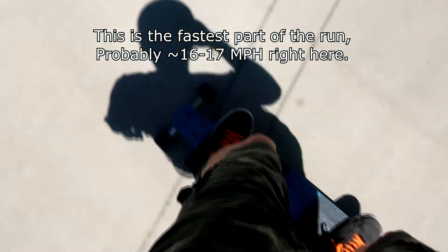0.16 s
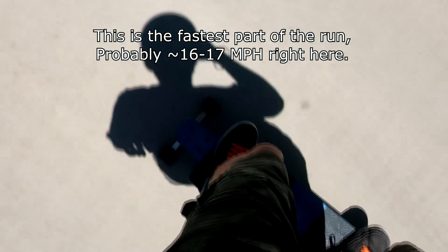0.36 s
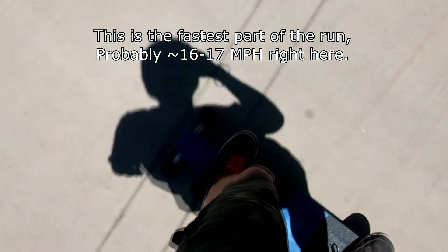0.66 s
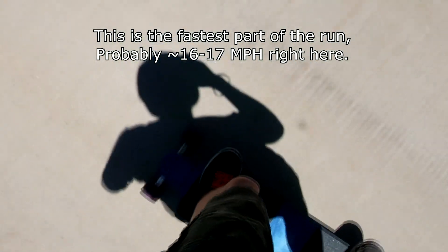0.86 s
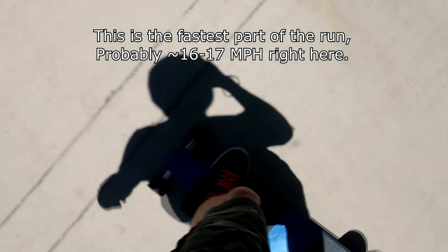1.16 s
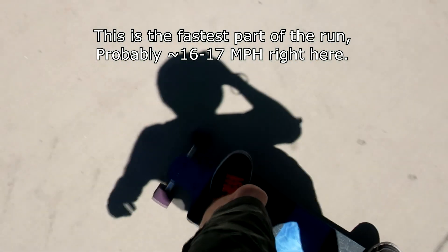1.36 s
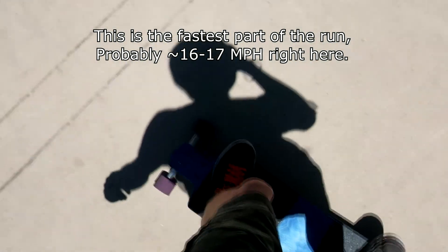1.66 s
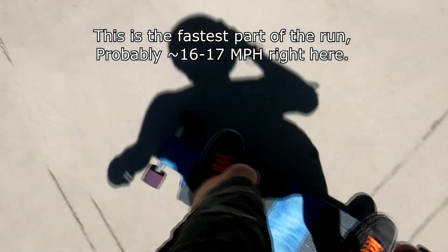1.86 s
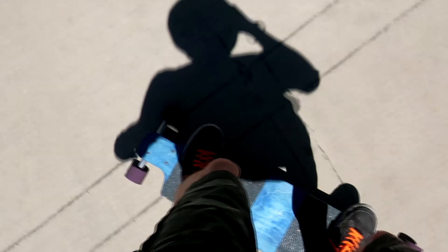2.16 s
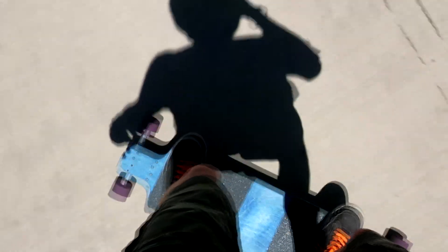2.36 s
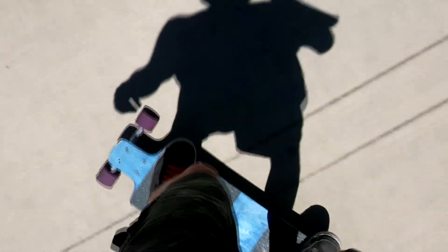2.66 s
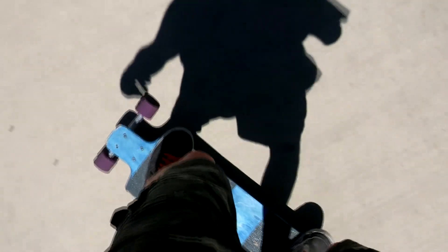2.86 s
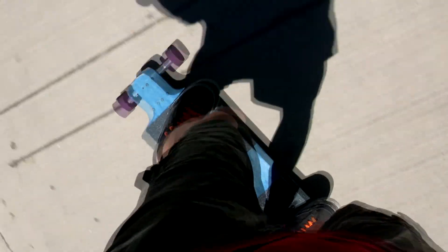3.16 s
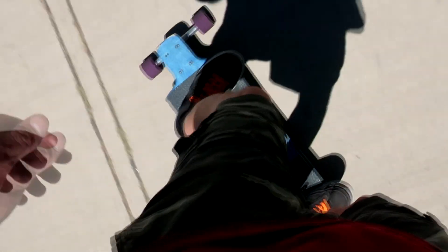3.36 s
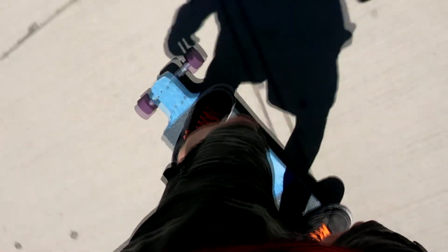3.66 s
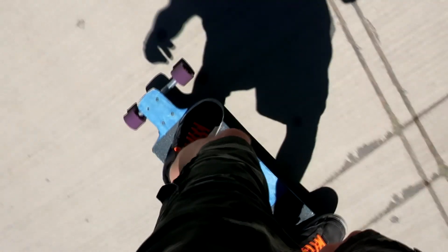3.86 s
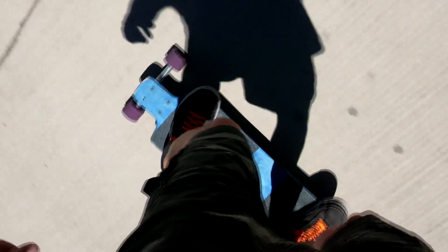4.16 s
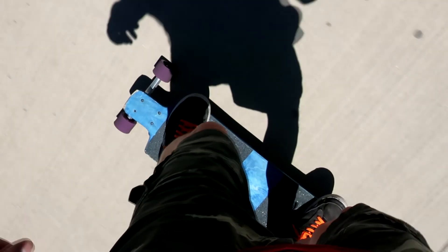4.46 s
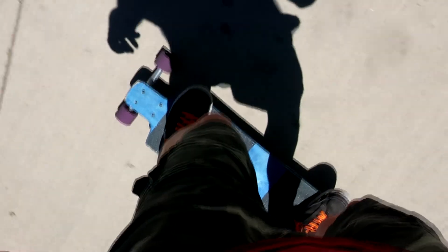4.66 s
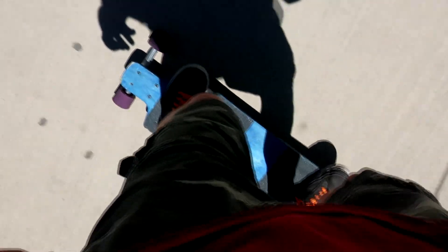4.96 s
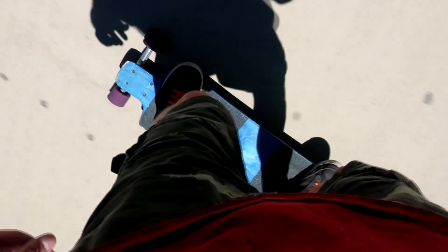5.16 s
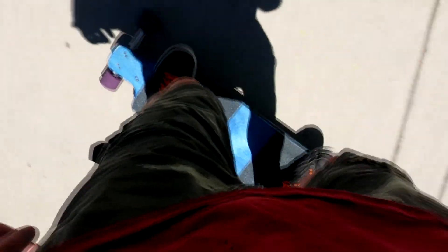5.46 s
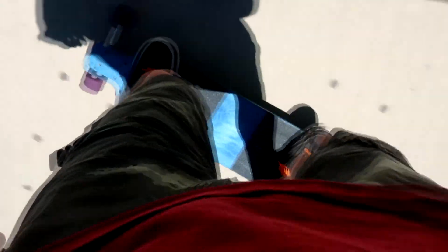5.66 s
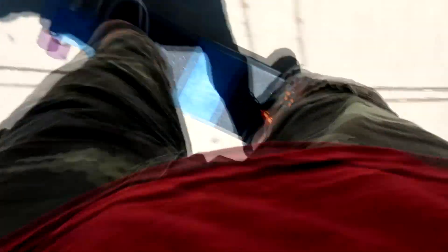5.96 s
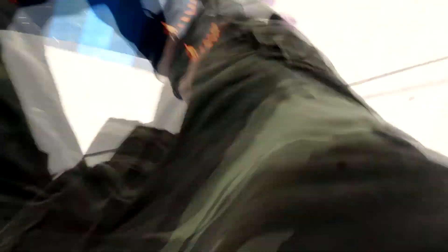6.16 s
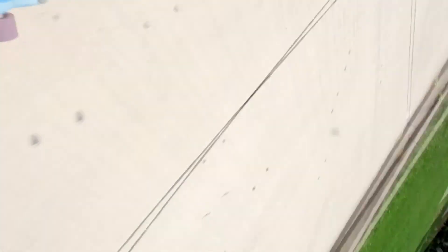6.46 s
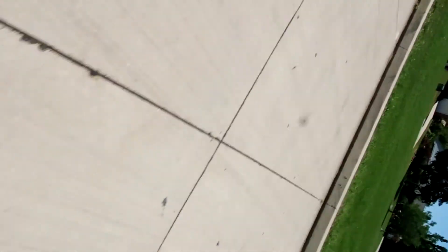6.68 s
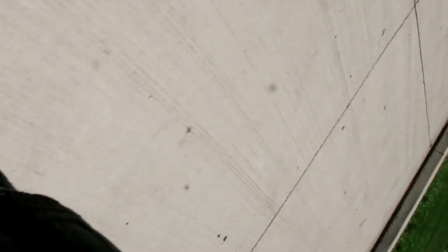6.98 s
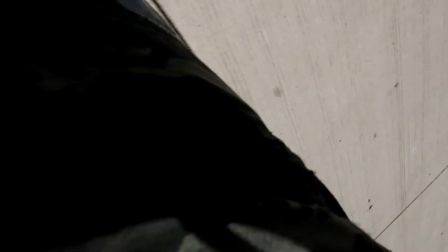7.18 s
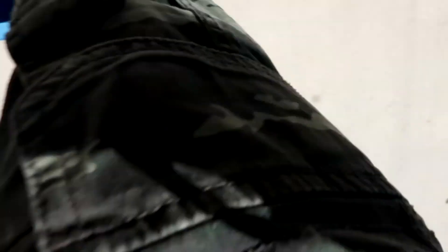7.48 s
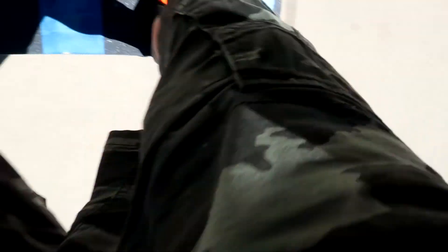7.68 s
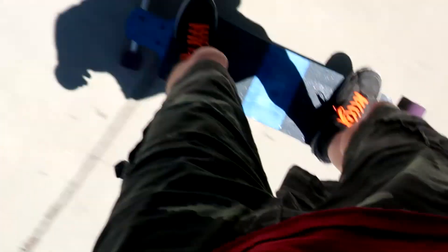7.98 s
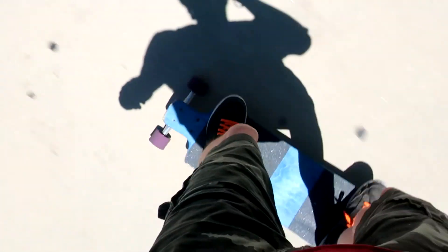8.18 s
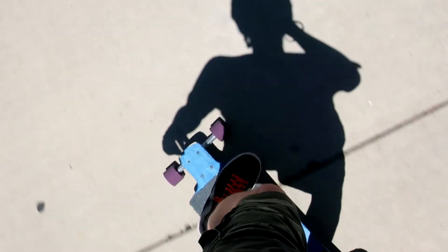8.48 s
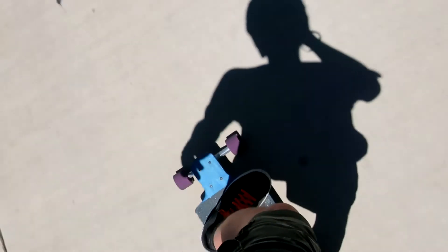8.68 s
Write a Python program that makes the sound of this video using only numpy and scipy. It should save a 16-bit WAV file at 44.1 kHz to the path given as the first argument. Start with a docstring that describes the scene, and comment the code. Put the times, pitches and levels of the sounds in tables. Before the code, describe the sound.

Close, handheld stereo sound from above a longboard speeding over outdoor concrete. A dense low-mid rumble runs throughout, with gritty metallic truck rattle and thin wheel hiss. Seams and stones give irregular clicks and dull knocks. Headwind buffets the microphone constantly; after six seconds it tears into bright slapping gusts, strongest just past seven, then eases back to rolling.

```python
"""A longboard rolls fast over jointed concrete, heard by a hand-held microphone pair above the deck.
Noise shaped as deck rumble, truck grit, ringing metal and wheel hiss jolts at joints and stones;
damped modes give low knocks, of axles in joints or wind on the ports. Headwind is fluttering noise
on the ports, with damped thumps and a bright, slapping rush when the pair turns into it.
Table levels are relative: gains and flutter in the functions shift them."""
import sys
import numpy as np
from scipy import signal
from scipy.fft import rfft, irfft, next_fast_len
from scipy.io import wavfile
from scipy.ndimage import uniform_filter1d

SR = 44100
rng = np.random.default_rng(int(sys.argv[2]) if len(sys.argv) > 2 else 0)


def bounce(signal):
    """Save signal as a 16-bit WAV file at the path given by the first command-line argument."""
    frames = np.transpose(np.atleast_2d(signal))
    limited = np.clip(frames, -1, 1)
    pcm = np.round(limited * 32767).astype(np.int16)
    wavfile.write(sys.argv[1], SR, pcm)


N = 389388


def from_db(db):
    """Amplitude gain of a level in dB."""
    return 10 ** (np.asarray(db) / 20)


def rms_one(x):
    """Scale to unit power."""
    return x / np.sqrt(np.mean(x ** 2) + 1e-20)


def unit(x):
    """Scale mid and side together to unit power in mid."""
    return x / x[0].std()


def in_time(rows):
    """Interpolate each column after t/s to one value a sample."""
    s, *columns = np.transpose(rows)
    t = np.arange(N) / SR
    return [np.interp(t, s, column) for column in columns]


def colour(x, points):
    """Causal minimum-phase filter through (f/Hz, gain/dB) points, by folding the cepstrum."""
    size = next_fast_len(N + SR // 4)
    hz = np.maximum(np.fft.rfftfreq(size, 1 / SR), 1)
    points_hz, points_db = np.transpose(points)
    db = np.interp(np.log(hz), np.log(points_hz), points_db)
    cepstrum = irfft(np.log(from_db(db)), size)
    cepstrum[1:size // 2] *= 2
    cepstrum[size // 2 + 1:] = 0
    response = np.exp(rfft(cepstrum))
    return irfft(rfft(x, size) * response, size)[..., :N]


def drift(rate_per_s):
    """Low-passed noise of unit power, changing about rate_per_s times a second."""
    r = np.exp(-2 * np.pi * rate_per_s / SR)
    noise = rng.standard_normal(N + SR)
    return rms_one(signal.lfilter([1], [1, -2 * r, r * r], noise)[SR:])   # first second settles


FLUTTER_SPAN_S = .2   # evens out over this time


def flutter(rate_per_s):
    """Quick wavering about a steady mean, bounded to +-2."""
    x = drift(rate_per_s)
    quick = x - uniform_filter1d(x, round(FLUTTER_SPAN_S * SR))
    return 2 * np.tanh(rms_one(quick) / 2)


def lumpy(db, rate_per_s):
    """Independent mid and side noise under one wavering level."""
    return rng.standard_normal((2, N)) * from_db(db * drift(rate_per_s))


def resonance(hz, width_hz):
    """Two-pole band-pass with about unit peak gain."""
    r = np.exp(-np.pi * width_hz / SR)
    b = (1 - r * r) / 2 * np.array([1, 0, -1])
    return b, [1, -2 * r * np.cos(2 * np.pi * hz / SR), r * r]


def moving_ring(x, hz, width_hz):
    """Resonance whose centre and width step along their curves in short blocks."""
    out, state, step = np.zeros_like(x), np.zeros((2, 2)), 1024
    width_hz = np.broadcast_to(width_hz, N)
    for i in range(0, N, step):
        b, a = resonance(hz[i], width_hz[i])
        out[:, i:i + step], state = signal.lfilter(b, a, x[:, i:i + step], zi=state)
    return out


def bursts(times_s, peak_db, t60_s, scatter_db=0):
    """Envelope of bursts, each a swell and a decay: x^2 exp(-x), normalised to its peak."""
    out, t = np.zeros(N), np.arange(SR // 8) / SR
    peak_db = peak_db + scatter_db * rng.standard_normal(len(times_s))
    for s, db, decay_s in np.broadcast(times_s, peak_db, t60_s):
        tau_s = np.clip(decay_s, .008, .12) / np.log(1000)
        i = round(max(s - tau_s, 0) * SR)
        x = t / tau_s
        burst = from_db(db) * (np.e * x / 2) ** 2 * np.exp(-x)
        out[i:i + len(t)] += burst[:N - i]
    return out


def tick_level(per_s, size, t60_s):
    """Level factor: 1 plus random ticks that swell and die, as of stones under a wheel or eddies breaking."""
    size_db = 1.5 * np.minimum(rng.exponential(1, N), 3)
    ticks = (rng.random(N) < per_s / SR) * from_db(size_db)
    r = from_db(-60 / (t60_s * SR))
    return 1 + size * np.e * signal.lfilter([1 - r], [1, -2 * r, r * r], ticks)


# Clicks in a jolt's cluster: t offset/s, level/dB
SNAP_TOUCHES = [(-.002, -8), (0, -1.5), (.002, -2.5), (.0045, -11)]
SNAP_DB = 12   # added to the peak and touch levels
TOUCH_JITTER_S, TOUCH_SCATTER_DB = 0.00065, 1.5


def snaps(times_s, peak_db):
    """A short cluster of clicks of either sign around each jolt."""
    out = np.zeros(N)
    for after_s, db in SNAP_TOUCHES:
        jitter, scatter, push = rng.standard_normal((len(times_s), 3)).T
        at = np.round((times_s + .002 + after_s + TOUCH_JITTER_S * jitter) * SR).astype(int)
        click_db = peak_db + SNAP_DB + db + TOUCH_SCATTER_DB * scatter
        out[at] += from_db(click_db) * np.sign(push)
    return out


# Deck rumble between jolts: t/s, level/dB
DECK_ROLL = [(0, -25), (.55, -23.5), (.7, -25.5), (.9, -21.5), (1.45, -25.5), (1.58, -30), (1.8, -24),
             (2.3, -25.5), (2.9, -24.5), (3.8, -22.5), (3.92, -25.5), (4.26, -22), (4.48, -26), (4.88, -22),
             (4.98, -27.5), (5.2, -22.5), (5.3, -23), (5.6, -28), (6.1, -23), (6.47, -21.5), (6.57, -28.5),
             (6.7, -20), (6.86, -26.5), (7.15, -17), (7.5, -24.5), (7.78, -22), (8.16, -36.5),
             (8.35, -34.5), (8.45, -30), (8.83, -23.5)]
# Deck rumble spectrum: f/Hz, density/dB per Hz
DECK_SPECTRUM = [(240, -19), (400, -5), (549, -1), (714, -5), (879, -8.5), (973, -5), (1120, -19.5),
                 (1370, -23), (1550, -25), (1720, -22), (2000, -26.5), (2600, -48.5), (4400, -120)]
# Joints and stones shaking the board: t/s, ring peak/dB, hardware re ring/dB, hiss re ring/dB
JOLTS = [(.0204, -28.5, -5, -11), (.2344, -33, 1, -13), (.398, -33, 7, -22), (.42, -39, 9, -22),
         (.4693, -30, -16, -33), (0.507, -37, 9, -22), (.521, -36, 6, -22), (0.616, -38, 8, -19),
         (.7123, -30, 1, -26), (.7575, -23, 2.5, -18), (.7864, -25, -5, -19), (0.8677, -27, -4, -16),
         (.8748, -22, -12, -18), (.8819, -18.5, 6.5, -13), (.9155, -31, 8, -15), (1.0373, -32, 11, -25),
         (1.305, -14.5, 0, -18), (1.4681, -24.5, 0, -18), (1.4864, -34, 9, -24), (1.656, -29, 2, -28),
         (1.8044, -40, -6, -5), (1.8462, -23, -5, -19), (1.946, -44, 15, -26), (1.981, -30, 10, -33),
         (2.001, -36, 5, -20), (2.008, -19, -1, -23), (2.0165, -31, 13, -12), (2.0244, -27.5, 7.5, -2),
         (2.0338, -25.5, 8, -3), (2.046, -29, 5, -1), (2.0554, -32, 13, -6), (2.0644, -36, 15, -14),
         (2.0873, -39, 10, -20), (2.1105, -50, 6, -20), (2.166, -38, -6, 2), (2.2117, -21.5, 3, -25),
         (2.24, -27, 1, -23), (2.289, -30, 0, -10), (2.399, -28, -10, -23), (2.576, -40, -5, 8),
         (2.6444, -27, -15, -23), (2.7228, -27, 3, -25), (3.2655, -24, -15, -14), (3.275, -14, -4, -22),
         (3.286, -36, 6, -12), (3.4273, -31.5, 10, -9), (3.4374, -32, 7, -2), (3.7933, -17.5, -12, -30),
         (3.848, -18, 4.5, -13), (3.855, -21, -1, -22), (3.9654, -17, -12, -21), (4.0123, -24, -16, -17),
         (4.0703, -21, -16, -28), (4.1683, -32, -18, -25), (4.1927, -19, -18, -25), (4.205, -22, -16, -25),
         (4.219, -25, -14, -25), (4.238, -20, -17, -23), (4.265, -20, -14, -25), (4.2724, -21, -12, -25),
         (4.283, -21, -14, -25), (4.296, -26, -10, -21), (4.319, -27, -16, -25), (4.363, -13.5, -18, -30),
         (4.374, -32, 2, -17), (4.398, -45, -16, -28), (4.4273, -35, -6, -14), (4.453, -27.5, -4, -25),
         (4.608, -28, -20, -31), (4.772, -28.5, -1, -21), (4.861, -19.5, 0.5, -16), (4.874, -21, -12, -24),
         (4.884, -35, -12, -24), (4.907, -26, -21, -25), (4.937, -32, 10.5, -16), (4.921, -27, -8, -24),
         (5.015, -32, -1, -20), (5.033, -33, 5, -21), (5.058, -38, -3, -22), (5.086, -41, 3, -22),
         (5.3737, -21, -4, -16), (5.3894, -23, -3.5, -16), (5.543, -18.5, -15, -20), (5.7815, -34, 2, 0),
         (5.9095, -27, -23, -30), (6.103, -16.5, -17, -22), (6.2894, -35, -8, 1), (6.769, -33, 1.5, -31),
         (7.1127, -22, -8, -26), (7.568, -19, -18, -26), (7.744, -15.5, -11, -26), (8.049, -25, -7, -17),
         (8.0666, -26.5, 8.5, -7), (8.077, -32, 3, -20), (8.089, -45, -2, -20), (8.2283, -27.5, 1, -24),
         (8.276, -34, 3, -17), (8.4674, -26, -2, -32), (8.5334, -26, -3, -30), (8.7226, -32, -2, -10)]
# Jolt decay by layer (grit, ring, hardware, hiss, deck): t60/s
JOLT_T60_S = [0.035, 0.025, 0.017, 0.023, 0.026]
# Jolt noise by layer (same order) re its peak: level/dB
JOLT_CHATTER_DB = [-13.5, -17, -16, -.6, -6]
LIFT_DB, LIFT_T60_S = 2, 0.047   # rumble dips briefly at each knock


def deck(paving_db):
    """Deck rumble: coloured noise under the rolling wheels, shuddering at jolts, dipping at knocks."""
    s, db, _, _ = np.transpose(JOLTS)
    knock_s = np.transpose(KNOCKS)[0]
    lift = np.minimum(bursts(knock_s, 0, LIFT_T60_S), 1)
    roll_db, = in_time(DECK_ROLL)
    level = from_db(roll_db + paving_db - LIFT_DB * lift)
    level += bursts(s, db + JOLT_CHATTER_DB[4], JOLT_T60_S[4])
    return level * unit(colour(lumpy(db=2.0, rate_per_s=13.7), DECK_SPECTRUM))


# Trucks between jolts: t/s, grit/dB, ring f/Hz, ring/dB, axle hardware/dB
TRUCKS = [(0, -44, 2060, -46.5, -42.5), (.6, -40, 2080, -45, -43), (.9, -43, 2100, -46, -39),
          (1.15, -37, 2000, -41.5, -46.5), (1.6, -38.5, 1930, -43, -45), (1.97, -31.5, 1940, -39.5, -40),
          (2.04, -43, 1970, -40, -41), (2.15, -31, 1950, -39.5, -38), (2.5, -34.5, 2010, -41.5, -45),
          (3.1, -33.5, 2180, -39, -41), (3.45, -40.5, 2100, -42.5, -42), (3.8, -34, 2200, -40, -42),
          (4.25, -44, 2300, -37.5, -47), (4.55, -37, 2210, -40, -45.5), (5.5, -39, 2290, -42.5, -46),
          (5.95, -37, 2350, -40, -41.5), (6.55, -49, 2250, -45, -54), (7.15, -35.5, 2310, -39, -48),
          (7.9, -39, 2120, -53.5, -49.5), (8.25, -42.5, 2060, -46, -49.5), (8.83, -39, 2200, -44, -40.5)]
# Truck grit spectrum: f/Hz, density/dB per Hz
GRIT_SPECTRUM = [(700, -16), (1200, 5.5), (1700, 2.5), (2300, -11), (2600, -7.5), (4400, -16),
                 (6100, -20.5), (8000, -25.5), (9000, -80.5), (15000, -56.5)]
# Truck ring bandwidth, per filter pass: t/s, width/Hz
RING_WIDTH = [(0, 480), (3.2, 480), (3.9, 670), (5.2, 650), (6, 550), (8.83, 544)]
# Axle hardware modes: f/Hz, width per pass/Hz, level/dB
HARDWARE_MODES = [(3440, 680, -2), (2910, 750, -11.5), (4000, 730, -12.5), (5170, 910, -10)]
NOTCH_RATIO, NOTCH_DEPTH, NOTCH_WIDTH_HZ = 0.86, 0.69, 1480   # grit dip, centre re ring


def truck_grit(grit_db, ring_hz, paving_db):
    """Grit shaking the trucks: a broad noise slope with a dip that follows the ring."""
    s, db, _, _ = np.transpose(JOLTS)
    grit = unit(colour(lumpy(db=1.3, rate_per_s=14.0), GRIT_SPECTRUM))
    grit = grit - NOTCH_DEPTH * moving_ring(grit, NOTCH_RATIO * ring_hz, NOTCH_WIDTH_HZ)
    steady = from_db(grit_db + paving_db + 1) * tick_level(per_s=44, size=.6, t60_s=0.0073)
    return grit * (steady + bursts(s, db + JOLT_CHATTER_DB[0], JOLT_T60_S[0]))


def truck_ring(ring_hz, ring_db, paving_db):
    """Truck ring: noise and jolt clicks through a wandering resonance, passed twice."""
    s, db, _, _ = np.transpose(JOLTS)
    steady = from_db(ring_db + paving_db + 0.94 * flutter(11))
    steady = steady * tick_level(per_s=40, size=.9, t60_s=0.0055)
    jolts = bursts(s, db + JOLT_CHATTER_DB[1], JOLT_T60_S[1])
    drive = lumpy(db=1.5, rate_per_s=49) * (steady + jolts)
    drive += snaps(s, db - 3.5)
    ring_hz = ring_hz * (1 + 0.024 * drift(25))
    width_hz, = in_time(RING_WIDTH)
    gain = np.sqrt(2 * SR / np.pi / width_hz)   # about unit power out of white noise
    once = moving_ring(drive, ring_hz, width_hz)
    return gain * moving_ring(once, ring_hz, width_hz)


def truck_hardware(hardware_db, paving_db):
    """Axle hardware: fixed modes, each shaken by its own noise and jolt clicks."""
    s, db, to_hardware_db, _ = np.transpose(JOLTS)
    peak_db = db + to_hardware_db
    out = np.zeros((2, N))
    for hz, width_hz, mode_db in HARDWARE_MODES:
        shake = from_db(hardware_db + paving_db - 3.5) * tick_level(per_s=33, size=.6, t60_s=0.015)
        shake += bursts(s, peak_db + JOLT_CHATTER_DB[2], JOLT_T60_S[2], scatter_db=6.0)
        drive = lumpy(db=2.5, rate_per_s=21) * shake + snaps(s, peak_db - 2.5)
        b, a = resonance(hz, width_hz)
        gain = from_db(mode_db) * np.sqrt(2 * SR / np.pi / width_hz)
        out += gain * signal.lfilter(b, a, signal.lfilter(b, a, drive))
    return out


def trucks(paving_db):
    """Trucks shaken by grit and jolts: grit noise, ring and hardware modes summed."""
    grit_db, ring_hz, ring_db, hardware_db = in_time(TRUCKS)
    out = truck_grit(grit_db, ring_hz, paving_db)
    out += truck_ring(ring_hz, ring_db, paving_db)
    return out + truck_hardware(hardware_db, paving_db)


ECHO_RATIO, ECHO_DEPTH, ECHO_WIDTH_HZ = 0.845, 0.44, 160   # dip centre re truck ring


def ground_echo(x):
    """Direct sound and concrete echo cancel in a narrow band: a resonance subtracted below the ring."""
    ring_hz = in_time(TRUCKS)[1]
    return x - ECHO_DEPTH * moving_ring(x, ECHO_RATIO * ring_hz, ECHO_WIDTH_HZ)


# Wheel hiss and stereo image: t/s, hiss/dB, width/dB
HISS_AND_WIDTH = [(0, -57, 4), (.42, -52.5, 1), (1.95, -53.5, -1.5), (2.03, -37, -6), (2.25, -52, 0),
                  (2.5, -57, 1), (3.17, -45.5, -4.5), (3.5, -51, -3.5), (4.28, -51, 3), (4.7, -74, 6),
                  (5.58, -67, 1), (6.15, -41, 2.5), (6.32, -47, 1), (6.52, -53, -3), (6.9, -42, -6.5),
                  (7.87, -46, -2), (8.24, -53, 1), (8.7, -46, -28)]
# Wheel hiss spectrum: f/Hz, density/dB per Hz
HISS_SPECTRUM = [(1760, -26.5), (3000, 1), (3550, 5.5), (4050, -2.5), (4600, 1.5), (5200, 7.5),
                 (5900, -0.5), (6780, 3), (8300, 0.5), (10000, -69), (13000, -42.5), (22000, -120)]
# Faint treble noise, 7 to 15 kHz: t/s, mid/dB, side/dB
FAINT_TREBLE = [(0, -64, -62), (1.95, -55.5, -47), (2.05, -55, -43), (2.13, -50, -46), (2.3, -52.5, -46),
                (2.4, -64, -52), (3.2, -58, -47), (3.6, -61.5, -57), (5.5, -60, -57), (6.1, -55.5, -46),
                (6.5, -84, -50), (7.05, -72, -38), (7.3, -54.5, -52), (7.6, -52, -43), (7.75, -69, -36),
                (8, -54.5, -56), (8.83, -55, -52)]
# Faint treble spectrum: f/Hz, density/dB per Hz
FAINT_TREBLE_SPECTRUM = [(7000, -46.5), (9500, 2), (12000, -2), (13500, -11), (14400, -4.5), (15000, 0.5)]


def hiss():
    """Wheel skins peel off concrete: coloured treble noise, with a fainter, higher noise above."""
    s, db, _, to_hiss_db = np.transpose(JOLTS)
    crack = bursts(s, db + to_hiss_db + JOLT_CHATTER_DB[3], JOLT_T60_S[3])
    hiss_db = in_time(HISS_AND_WIDTH)[0]
    skin = unit(colour(lumpy(db=3.5, rate_per_s=21.0), HISS_SPECTRUM))
    skin = skin * (from_db(hiss_db + 3.5) + crack)
    faint_db = np.array(in_time(FAINT_TREBLE)) + 2.0 * np.array([drift(11), drift(6)])
    faint = unit(colour(rng.standard_normal((2, N)), FAINT_TREBLE_SPECTRUM))
    faint = faint * (from_db(faint_db) + crack * [[.15], [.3]])
    return skin * [[.3], [1]] + faint


# Headwind on the ports: t/s, buffeting/dB, drone/dB
WIND = [(0, -13.5, -18.5), (.15, -19, -22), (.22, -18, -19.5), (.5, -21.5, -21.5), (.61, -16, -17),
        (.72, -21, -21.5), (.85, -19, -25), (.97, -23.5, -36), (1.08, -19, -20), (1.5, -20.5, -20),
        (1.75, -21.5, -23), (2.1, -18, -22), (2.52, -20.5, -20), (2.62, -22, -28.5), (2.75, -23, -26),
        (2.92, -17.5, -23.5), (3.25, -20.5, -23), (3.33, -28, -50), (3.46, -22, -31), (3.64, -16, -26.5),
        (3.86, -18.5, -23), (3.93, -21.5, -33), (4.15, -22, -26.5), (4.35, -21, -19), (4.75, -21, -22.5),
        (4.93, -18, -17), (5.15, -28, -23.5), (5.23, -17.5, -21.5), (5.29, -20, -13), (5.36, -17, -15),
        (5.43, -22.5, -22.5), (5.51, -16, -11.5), (5.56, -16, -13.5), (5.6, -29, -31), (5.635, -24, -18.5),
        (5.66, -29, -31), (5.74, -21.5, -21), (6.1, -20, -21.5), (6.2, -16.5, -11), (6.33, -17.5, -27.5),
        (6.5, -26, -21), (6.85, -25.5, -28.5), (7.1, -21.5, -20), (7.35, -26.5, -23), (7.5, -23, -19),
        (7.67, -25, -21), (7.87, -18.5, -16), (8.1, -32.5, -27), (8.14, -19, -20), (8.18, -17, -19.5),
        (8.28, -20.5, -18), (8.34, -19, -9.5), (8.37, -20.5, -19), (8.4, -29, -25), (8.45, -30, -24),
        (8.6, -31.5, -43), (8.7, -23.5, -24), (8.83, -31.5, -48)]
# Buffeting spectrum: f/Hz, density/dB per Hz
BUFFET_SPECTRUM = [(70, -42.5), (120, -11), (200, -3.5), (270, 2), (330, -2.5), (450, -13.5), (700, -23),
                   (1500, -78)]
# Port drone spectrum: f/Hz, density/dB per Hz
DRONE_SPECTRUM = [(200, -46.5), (320, -3), (400, -2), (465, 0), (500, -9.5), (540, -22.5), (700, -34),
                  (1500, -77.5)]
# Deep rumble re buffeting: t/s, level/dB
SWELL = [(0, -10), (1.3, -12.5), (2, -12), (3.4, -8), (5.5, -10.5), (5.7, -4.5), (6.3, -8), (6.55, -15),
         (6.9, -10), (7.1, -2), (7.9, -11.5), (8.2, -13), (8.6, -27), (8.83, -27)]
# Deep rumble spectrum: f/Hz, density/dB per Hz
DEEP_SPECTRUM = [(25, -44), (40, -11.5), (63, -1.5), (90, 4.5), (125, 8.5), (160, 13), (220, 6.5),
                 (400, -53.5)]
# Buffeting lean to the port facing the wind: t/s, left re right/dB
LEAN = [(0, -2.2), (.45, -2.2), (.55, -.2), (4.1, -.2), (4.3, -2), (5, -2), (5.1, -.5), (5.6, -.2), (6, 1),
        (6.5, 1), (8, .6), (8.83, .6)]
GUST_FLUTTER_DB, GUST_FLUTTER_PER_S = 0.75, 10.3   # shared by the low layers
EDDY_FLUTTER_DB = 0.94   # own to buffeting and drone


def wind_lows():
    """Eddies on the ports: lumpy buffeting, drone and deep swell; also returns the side lean."""
    gust_db = GUST_FLUTTER_DB * flutter(GUST_FLUTTER_PER_S)
    buffet_db, drone_db = (db + gust_db + EDDY_FLUTTER_DB * flutter(7.3) for db in in_time(WIND))
    deep_db = buffet_db + in_time(SWELL)[0]
    lows = from_db(buffet_db) * unit(colour(lumpy(db=0.97, rate_per_s=27), BUFFET_SPECTRUM))
    lows += from_db(drone_db) * unit(colour(lumpy(db=0.93, rate_per_s=19.0), DRONE_SPECTRUM))
    deep = from_db(deep_db) * unit(colour(lumpy(db=2.0, rate_per_s=20), DEEP_SPECTRUM))
    left_to_right = from_db(in_time(LEAN)[0])
    side_to_mid = (left_to_right - 1) / (left_to_right + 1)
    return lows + deep, side_to_mid * lows[0]


# Low knocks, of axles in joints or wind on the ports: t/s, peak/dB, f/Hz, t60/s
KNOCKS = [(0.017, -16, 324, 0.029), (.287, -9, 403, 0.041), (.492, -4, 556, 0.021), (0.756, -8, 287, 0.045),
          (0.85, -22, 428, 0.021), (0.874, -11, 247, 0.035), (.885, -4, 295, 0.049), (0.918, 3, 420, 0.014),
          (1.035, -17, 330, 0.024), (1.209, -18, 487, 0.023), (1.306, -3, 292, 0.04),
          (1.468, 2.5, 540, 0.025), (1.619, -19, 238, 0.033), (1.646, -34, 340, 0.022),
          (1.946, -8, 278, .025), (2.263, -6, 311, 0.041), (2.407, -6.5, 364, 0.039),
          (3.275, -5.5, 288, 0.053), (3.356, -17, 387, 0.03), (3.434, -1.5, 499, 0.039),
          (3.445, -13, 416, 0.019), (3.597, -4, 517, 0.014), (3.847, 3.5, 270, 0.028),
          (3.858, -5, 290, 0.042), (4.005, 3, 524, 0.021), (4.015, -4, 570, 0.02), (4.362, -11, 286, 0.092),
          (4.605, -4, 390, 0.029), (4.839, 0, 298, 0.019), (4.86, -7, 318, 0.04), (4.931, -6, 383, 0.034),
          (5.124, -8, 490, 0.017), (5.276, -6.5, 430, 0.045), (5.373, -11, 443, 0.033),
          (6.006, -3.5, 395, 0.034), (6.293, -4, 414, 0.05), (6.306, -6.5, 299, 0.056),
          (7.093, -0.5, 345, 0.026), (7.168, 3, 400, 0.02), (7.409, -6.5, 445, 0.032),
          (7.705, -2, 358, 0.02), (7.739, 0, 800, 0.015), (7.744, -4, 530, 0.027), (7.818, 0, 449, 0.036),
          (7.854, -25, 500, 0.023)]
# Knock modes: multiple of knock f, level/dB
KNOCK_MODES = [(1, 3), (.78, -7), (1.27, -19.5), (.55, -16.5), (1.9, -13)]


def knocks():
    """Each knock rings damped modes after a soft onset."""
    out, t = np.zeros(N), np.arange(SR // 8) / SR
    for (s, db, hz, t60_s), sign in zip(KNOCKS, rng.choice([-1, 1], len(KNOCKS))):
        i = round(s * SR)
        envelope = from_db(-60 * t / t60_s) * (1 - np.exp(-t / 0.0057))
        ring = sum(from_db(mode_db) * np.sin(2 * np.pi * ratio * hz * t)
                   for ratio, mode_db in KNOCK_MODES)
        knock = sign * from_db(db + 6.5) * envelope * ring
        out[i:i + len(t)] += knock[:N - i]
    return out


# Large eddies hitting the ports: t/s, peak/dB, f/Hz
THUMPS = [(0.062, -7, 285), (0.117, -7, 296), (0.42, -7, 388), (0.528, -18, 242), (0.57, -1, 326),
          (0.611, -4, 231), (0.655, -2, 222), (1.069, -3, 368), (1.264, -5, 220), (1.435, -6, 239),
          (1.511, -9, 312), (1.568, -5, 283), (1.749, -7, 229), (1.814, -10, 280), (2.029, -4, 245),
          (2.07, -7, 345), (2.179, -14, 243), (2.291, -5, 231), (2.439, -9, 256), (2.772, -6, 326),
          (2.859, -11, 310), (2.909, -11, 275), (3.069, -12, 320), (3.149, -7, 280), (3.621, -9, 334),
          (3.659, -6, 215), (3.809, -4, 261), (4.249, -10, 294), (4.289, -8, 440), (4.389, -1, 264),
          (4.493, -0.5, 392), (4.648, -1, 331), (5.329, -8, 480), (5.455, -5, 299), (5.499, -8, 436),
          (5.548, -10, 450), (5.83, -2, 480), (5.953, -1.5, 269), (6.109, 0, 430), (6.21, -10, 426),
          (6.428, -6, 231), (6.649, -11, 320), (6.891, -9, 390), (7.037, -2, 380), (7.123, -7, 440),
          (7.319, -4, 474), (7.334, -3, 393), (7.498, -12, 304), (7.619, -12, 337), (7.899, -7, 423),
          (8.029, -6, 416), (8.052, -14, 369), (8.068, -7, 290), (8.199, -9, 253), (8.297, -6, 400),
          (8.349, -11, 334)]
THUMP_T60_S, THUMP_RISE_S = 0.028, 0.0036


def thumps():
    """A large eddy hits the ports: a damped sine of a few cycles."""
    out, t = np.zeros(N), np.arange(SR // 8) / SR
    envelope = from_db(-60 * t / THUMP_T60_S) * (1 - np.exp(-t / THUMP_RISE_S))
    for (s, db, hz), sign in zip(THUMPS, rng.choice([-1, 1], len(THUMPS))):
        i = round(s * SR)
        out[i:i + len(t)] += sign * from_db(db + 7.0) * envelope * np.sin(2 * np.pi * hz * t)
    return out


# Bright rush with the microphones turned into the wind: t/s, level/dB
RUSH = [(5.65, -51), (5.72, -31.5), (6.318, -33.5), (6.33, -26), (6.342, -28), (6.35, -37), (6.361, -40),
        (6.372, -28), (6.41, -27), (6.435, -29), (6.47, -37.5), (6.57, -37), (6.76, -25.5), (6.83, -40),
        (7.05, -29.5), (7.11, -32), (7.14, -32), (7.17, -20.5), (7.21, -24), (7.235, -18.5), (7.27, -23),
        (7.295, -27), (7.32, -32), (7.345, -23), (7.39, -28), (7.43, -36), (7.72, -31.5), (7.85, -39),
        (7.95, -45)]
# Rush spectrum: f/Hz, density/dB per Hz
RUSH_SPECTRUM = [(290, -44), (500, -8), (750, 1), (1040, 0.5), (1600, -6.5), (1760, -7), (2200, -14),
                 (2690, -23), (3920, -47), (4480, -35), (6000, -34.5), (7800, -71), (13200, -120)]
# Gust slaps in the rush: t/s, peak/dB, step per higher band/dB
SLAPS = [(5.705, -10.5, -22), (6.307, -13, -5), (6.321, -15.5, 2), (6.329, -9, 3), (6.336, -9.5, 1),
         (6.345, -25, -3), (6.369, -17, 3.5), (6.376, -13.5, 2.5), (6.386, -12, 2.5), (6.396, -19, -1),
         (6.405, -11, 3.5), (6.43, -13, -2), (6.446, -15, 1), (6.463, -11, 0), (6.485, -20, 6),
         (6.51, -26, 2), (6.549, -31, 7.5), (6.6, -22, 2), (6.749, -28, -10), (6.879, -24, 4.5),
         (6.92, -15.5, 3), (7.063, -28, -7), (7.088, -24, -10), (7.11, -29, 9), (7.143, -17, 0),
         (7.168, -16, 0), (7.186, -10, 4), (7.2, -8, 4.5), (7.212, -14, 2.5), (7.242, -12, 2.5),
         (7.226, -13, 2), (7.262, -8, 0), (7.283, -25, 7), (7.306, -17, 7), (7.334, -9, 3),
         (7.348, -9, -2.5), (7.38, -12, 2.5), (7.409, -15, 0), (7.564, -29, -2), (7.704, -34, 0),
         (7.733, -8, 1.5), (7.739, -16, -2), (7.748, -24, 7.5), (7.855, -27, 2), (8.07, -20, 1)]
RUSH_BANDS_HZ = [(300, 900), (900, 1600), (1600, 2600), (2600, 3900)]   # one per eddy size
RUSH_WIDTH_DB = 12.5   # side gain: rush eddies differ more from port to port


def wind_rush():
    """Ragged bright rush: noise bands, one per eddy size, flutter apart and slap in gusts."""
    start, end = (RUSH[0][0] - .1, -70), (RUSH[-1][0] + 0.11, -70)
    rush_db, = in_time([start] + list(RUSH) + [end])
    s, db, bright_db = np.transpose(SLAPS)
    steady = from_db(rush_db + 1.5) * tick_level(per_s=130, size=.4, t60_s=0.015)
    grain_db = 2.23 * drift(250)   # rattle shared by all bands
    noise = unit(colour(rng.standard_normal((2, N)), RUSH_SPECTRUM))
    rush = 0
    for k, band_hz in enumerate(RUSH_BANDS_HZ):
        band = signal.sosfilt(signal.butter(2, band_hz, "band", fs=SR, output="sos"), noise)
        slaps = bursts(s, db - 10.5 + k * bright_db, 0.028)
        rush = rush + band * (steady + slaps) * from_db(grain_db + 2.1 * drift(120))
    return rush * from_db([[0], [RUSH_WIDTH_DB]])


# Stereo width spectrum: f/Hz, side re mid/dB
WIDTH_SPECTRUM = [(60, -31), (110, -80.5), (200, -40.5), (370, -25), (690, -18.5), (1270, -15.5),
                  (2330, -8), (4300, -7.5), (7910, 10), (14600, 8.5)]
SHARED = 0.17   # power share of side drawn from mid, before colouring
TRUCK_LEAN = -0.097   # truck sound leaking from mid to side
PAVING_DB, PAVING_PER_S = 0.5, 7.8   # rougher and smoother stretches, felt by deck and trucks alike


def scene():
    """Mix board and wind as mid and side; lows sit in the middle, treble goes out of phase."""
    paving_db = PAVING_DB * flutter(PAVING_PER_S)
    rumble = ground_echo(deck(paving_db))
    metal = ground_echo(trucks(paving_db))
    treble = hiss()
    lows, lows_lean = wind_lows()
    hits = (knocks() + thumps()) * [[1], [.3]]
    mid, apart = rumble + metal + lows + hits + wind_rush()
    width_db = in_time(HISS_AND_WIDTH)[1]
    side = colour(np.sqrt(SHARED) * mid + np.sqrt(1 - SHARED) * apart, WIDTH_SPECTRUM)
    side = side * from_db(width_db) + lows_lean + TRUCK_LEAN * metal[0]
    mid, side = np.array([mid, side]) + treble
    return np.array([mid + side, mid - side])


LOW_CUT_HZ, STOPBAND_HZ = 40, 15165


def record(dry):
    """The microphone drops the deep bass, peaks are rounded, the top is cut."""
    thin = signal.sosfilt(signal.butter(2, LOW_CUT_HZ, "high", fs=SR, output="sos"), dry)
    rounded = 1.191 * np.tanh(thin / 1.366)
    return signal.sosfilt(signal.cheby2(20, 70, STOPBAND_HZ, fs=SR, output="sos"), rounded)


dry = scene()
out = record(dry)
bounce(out)
```